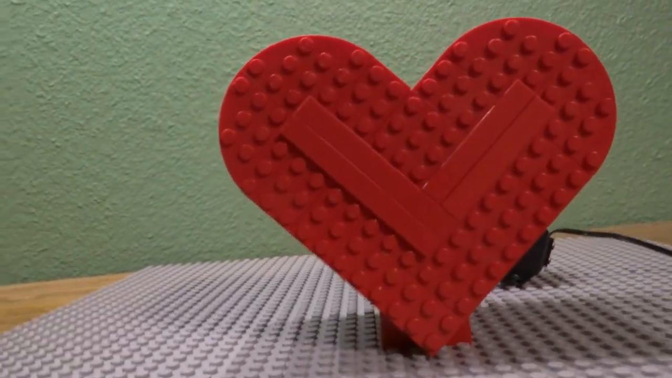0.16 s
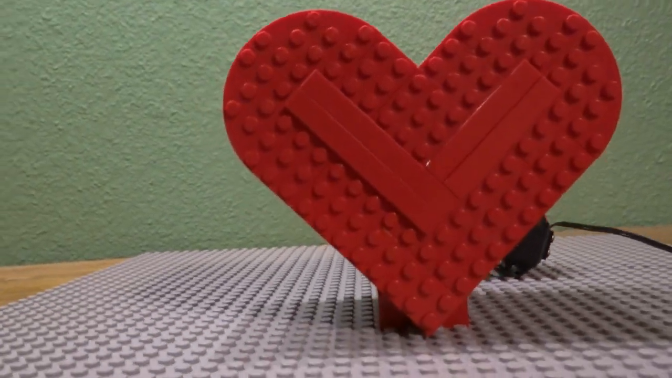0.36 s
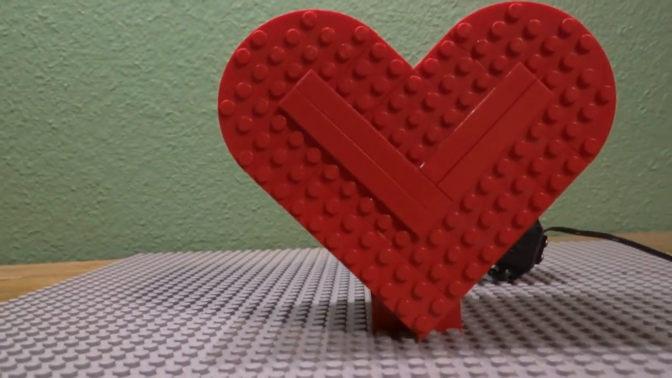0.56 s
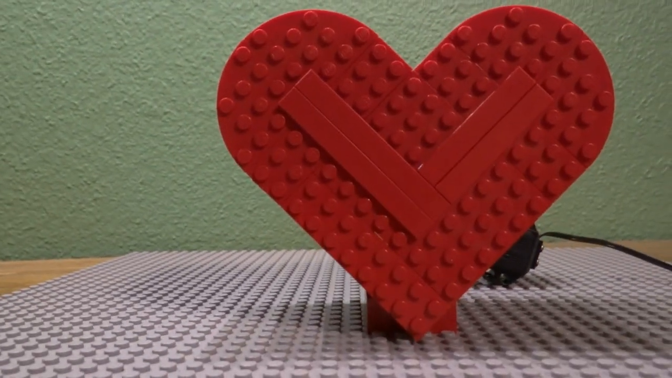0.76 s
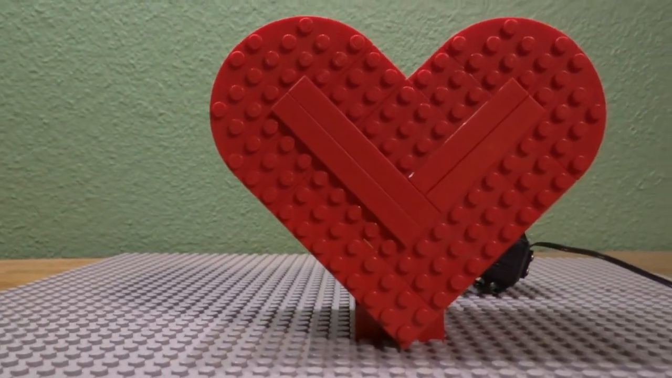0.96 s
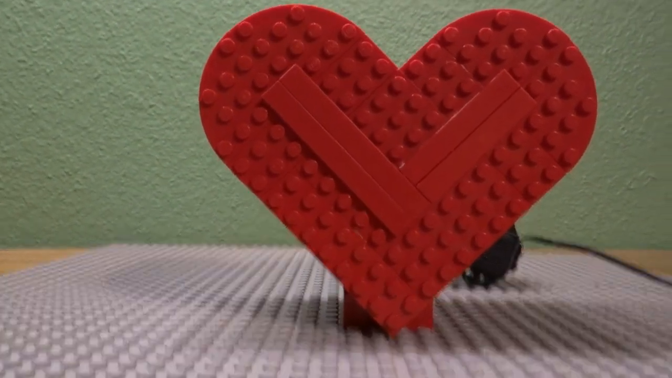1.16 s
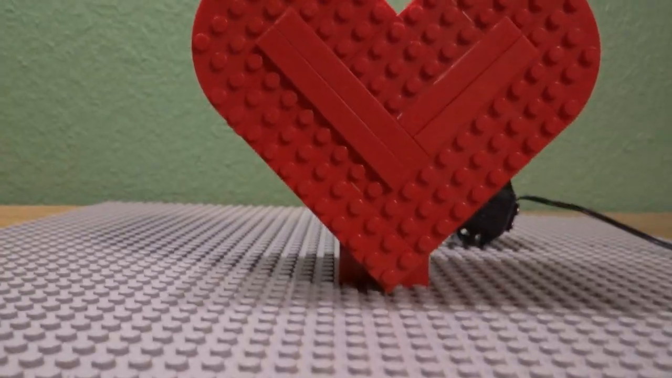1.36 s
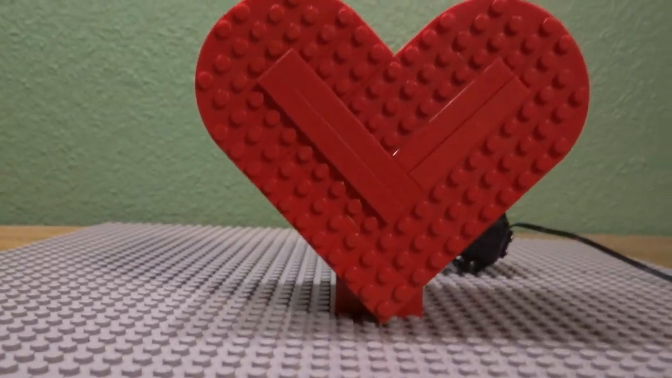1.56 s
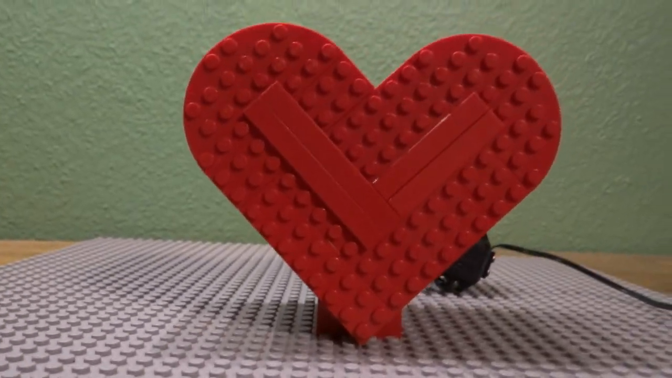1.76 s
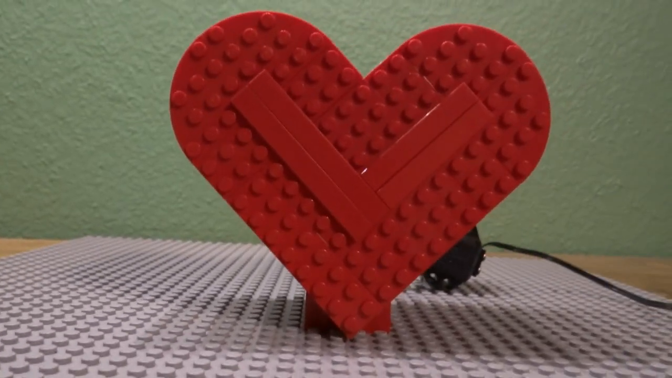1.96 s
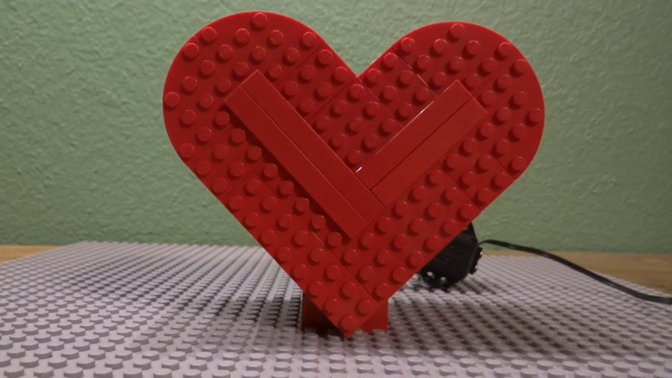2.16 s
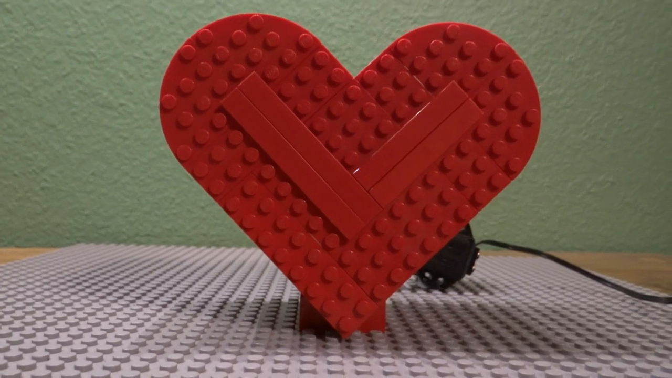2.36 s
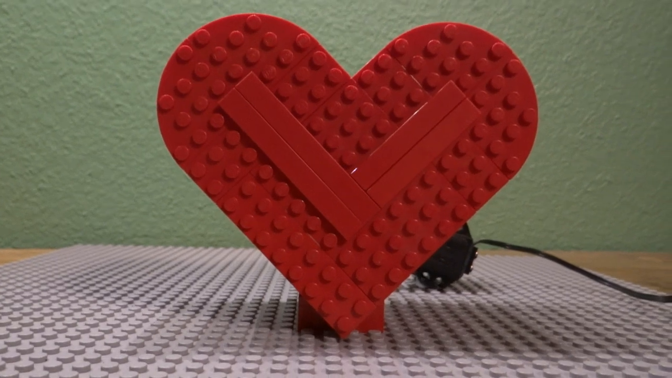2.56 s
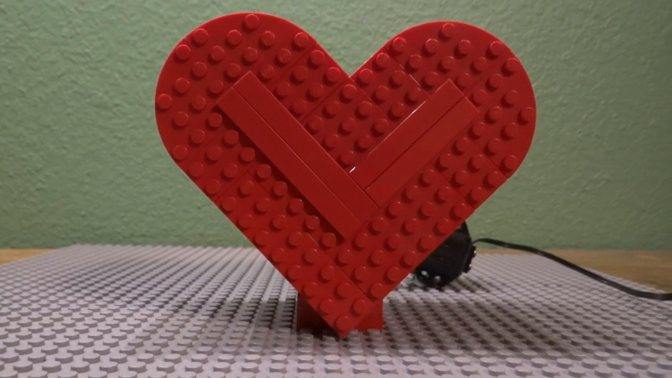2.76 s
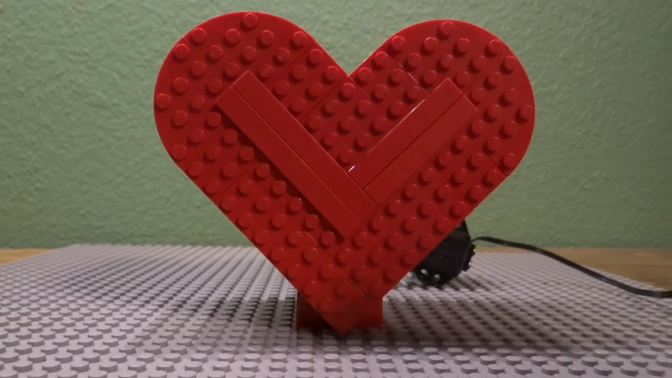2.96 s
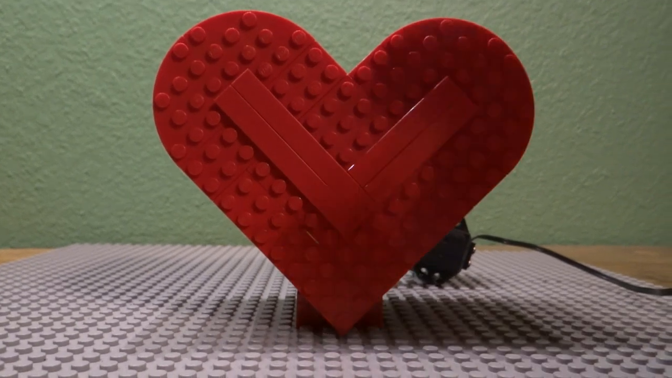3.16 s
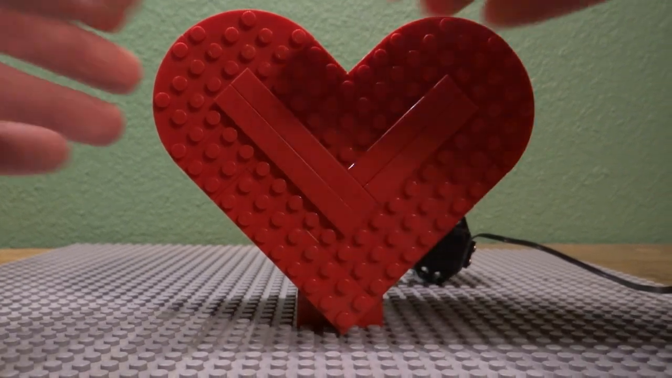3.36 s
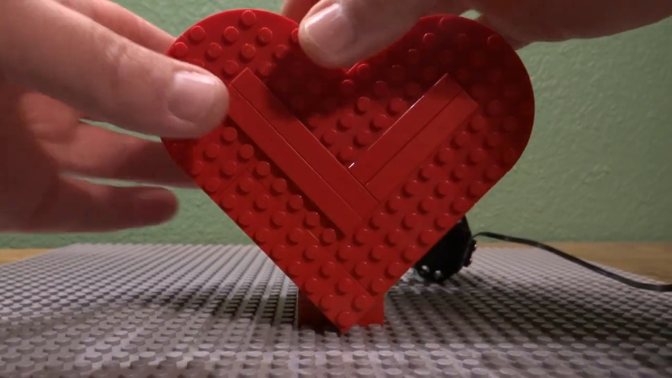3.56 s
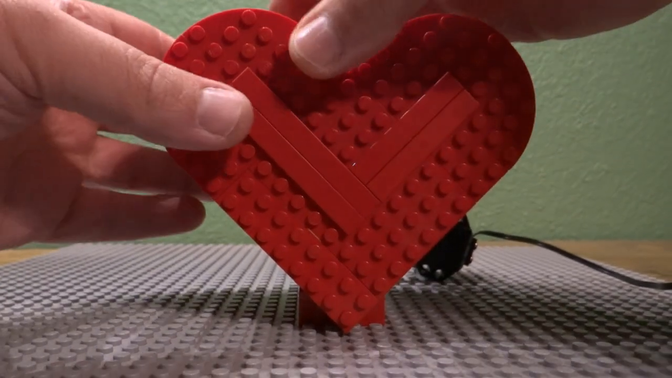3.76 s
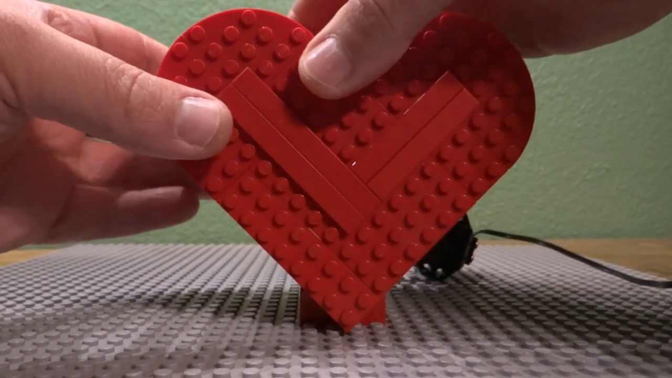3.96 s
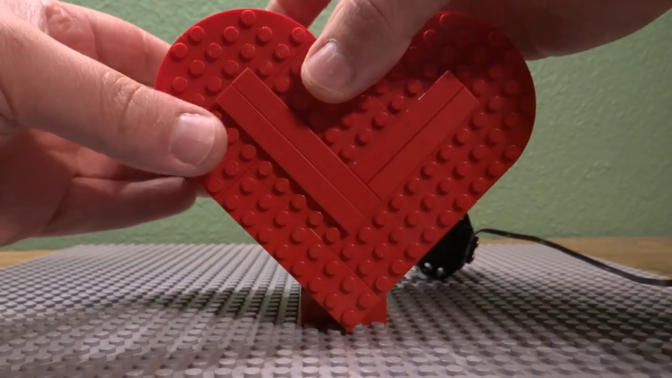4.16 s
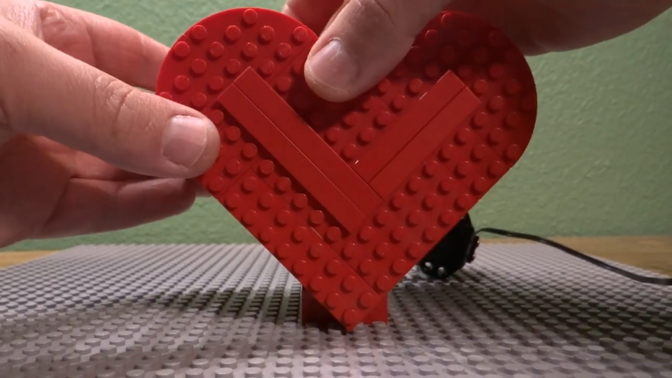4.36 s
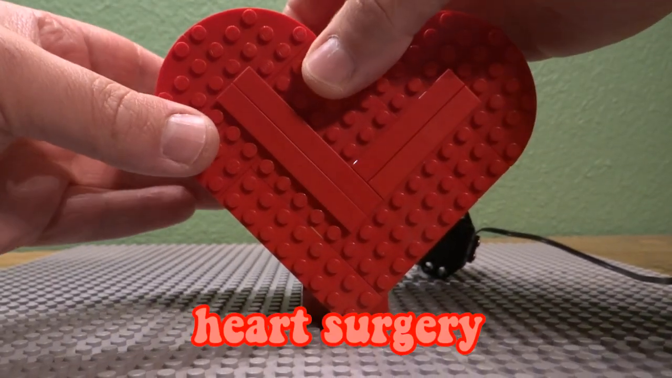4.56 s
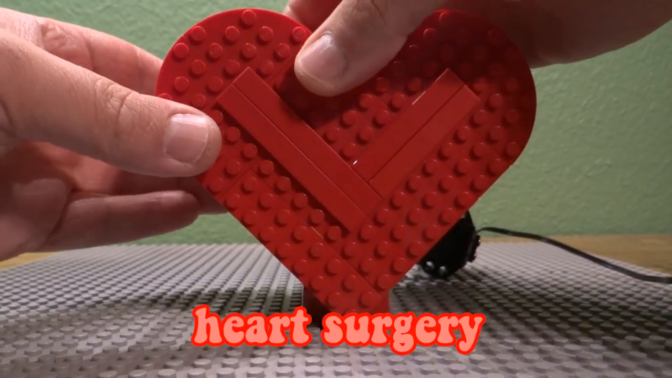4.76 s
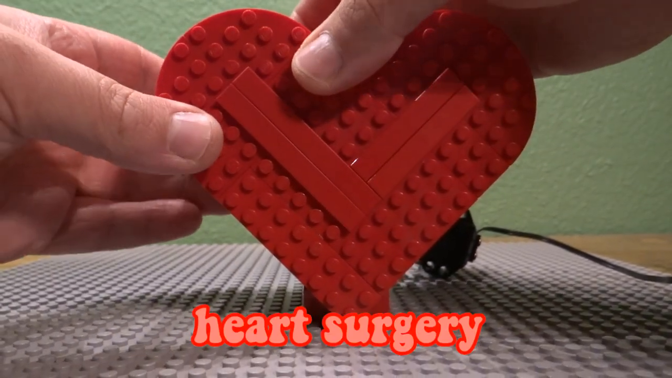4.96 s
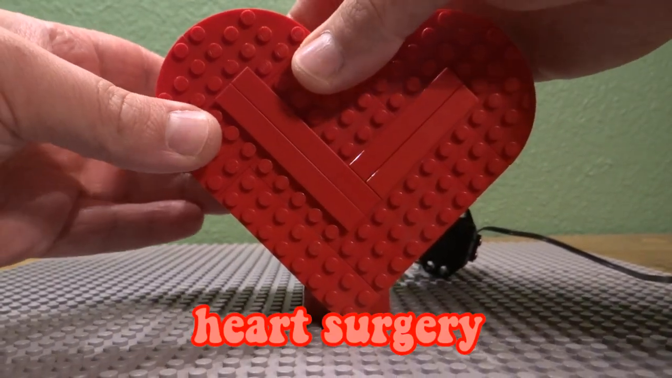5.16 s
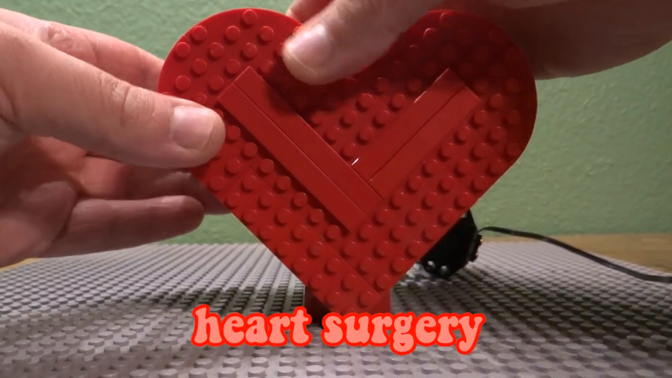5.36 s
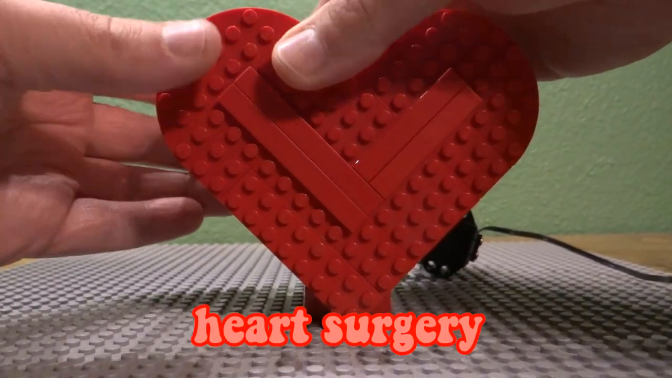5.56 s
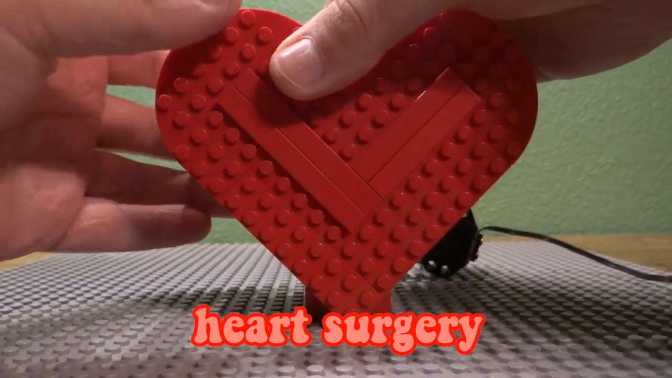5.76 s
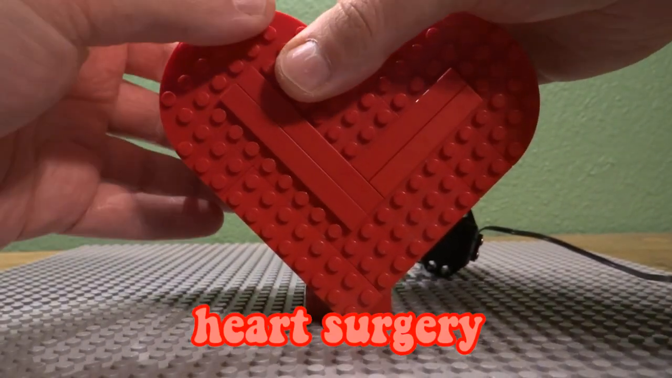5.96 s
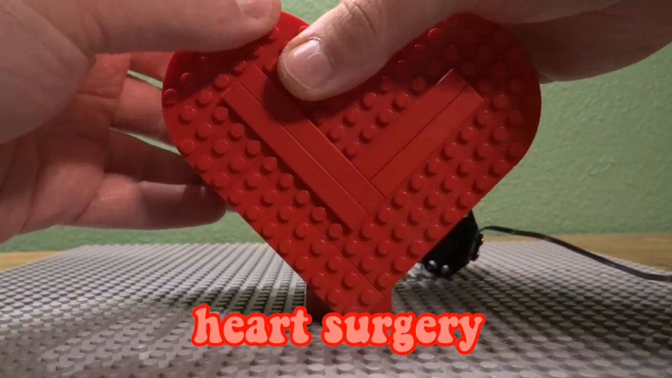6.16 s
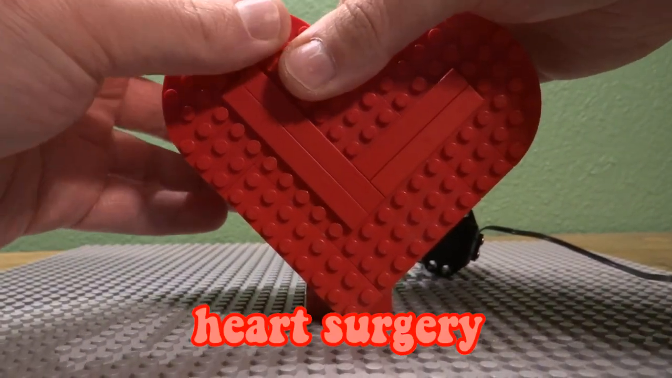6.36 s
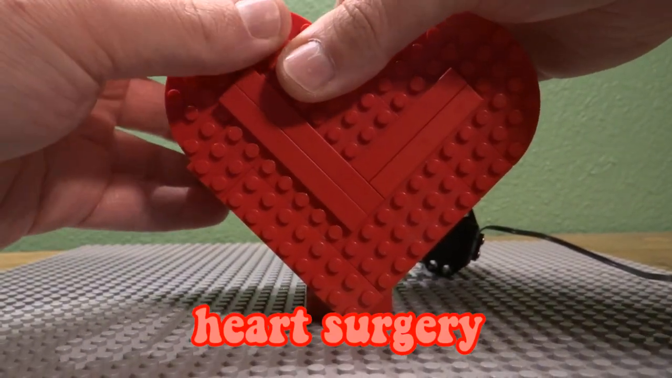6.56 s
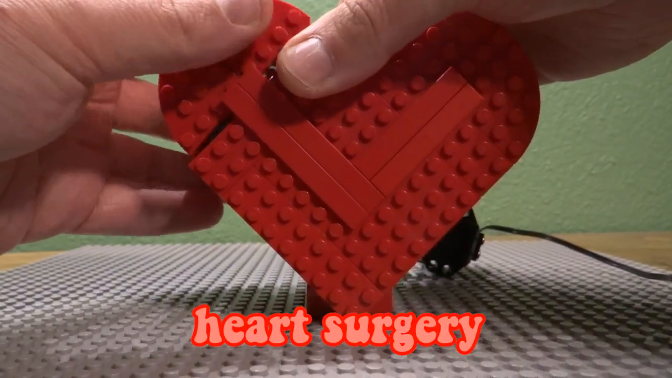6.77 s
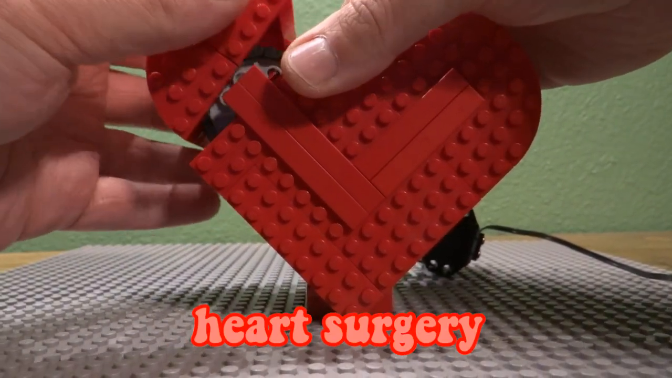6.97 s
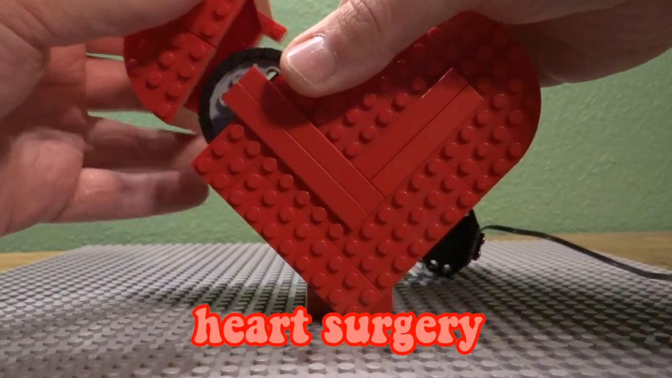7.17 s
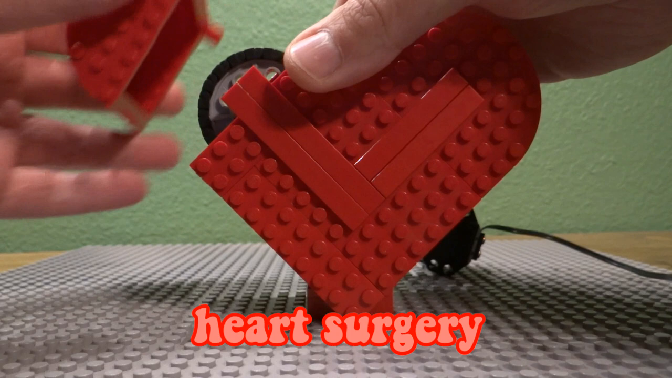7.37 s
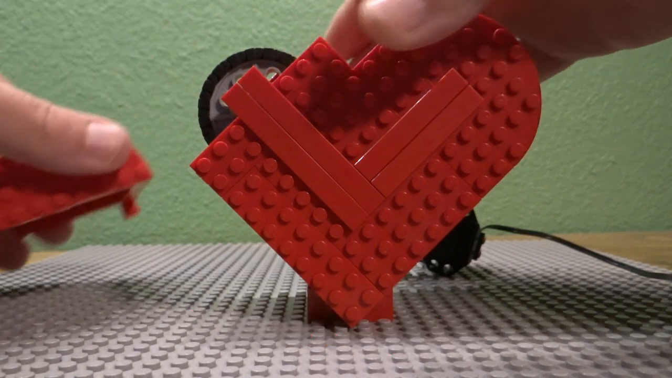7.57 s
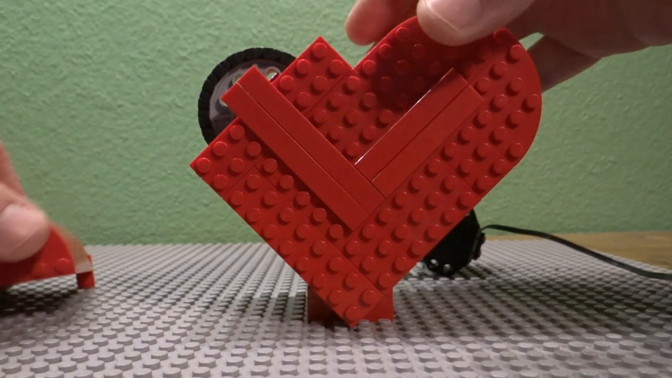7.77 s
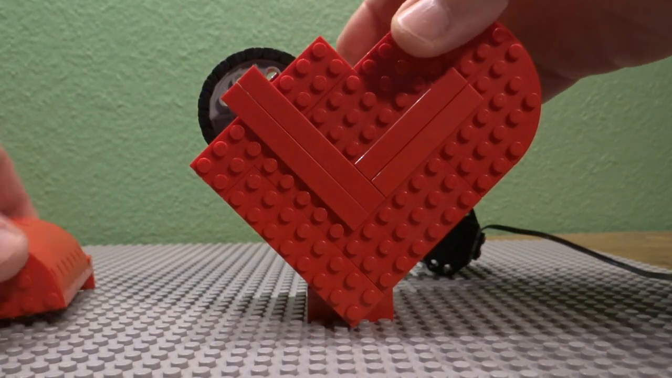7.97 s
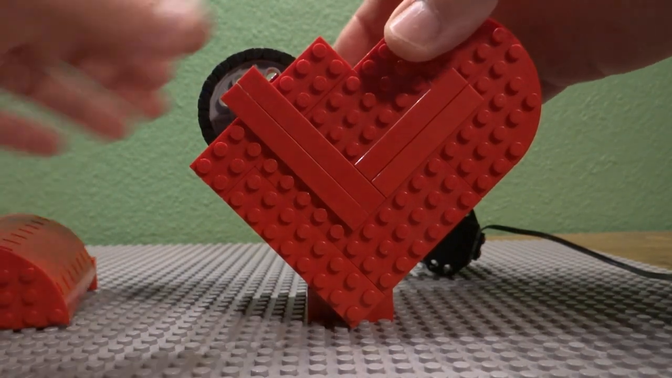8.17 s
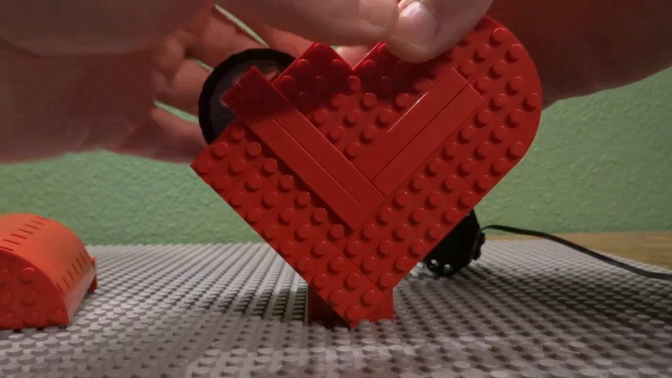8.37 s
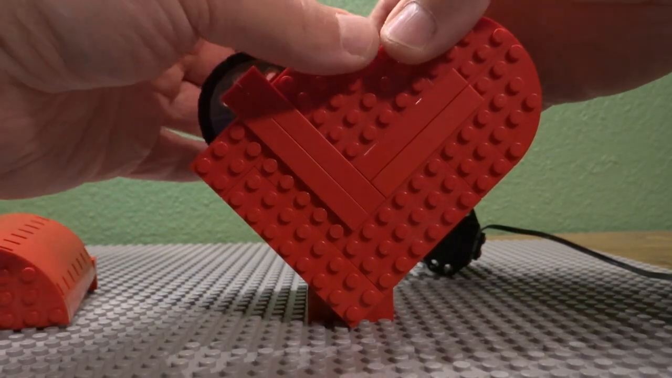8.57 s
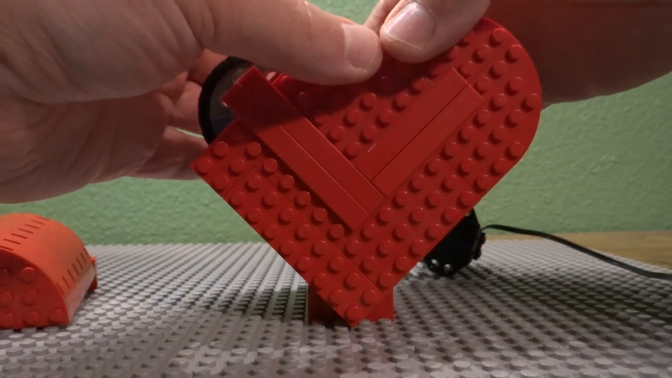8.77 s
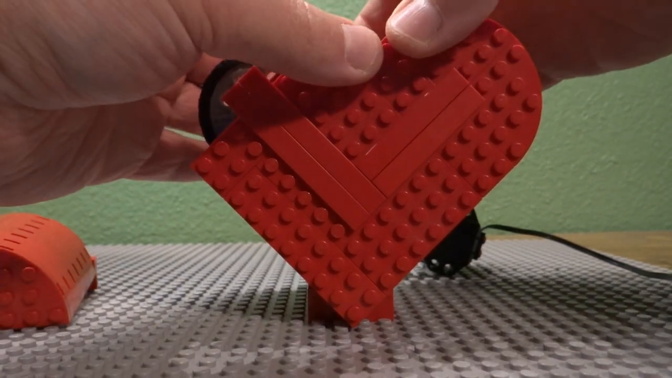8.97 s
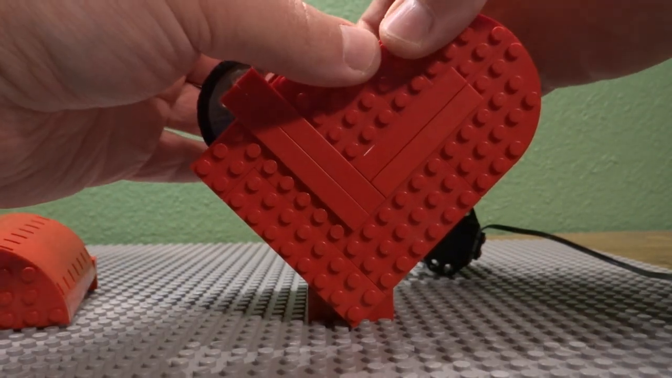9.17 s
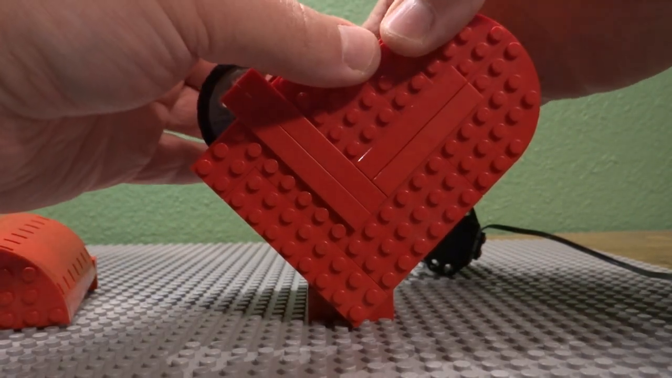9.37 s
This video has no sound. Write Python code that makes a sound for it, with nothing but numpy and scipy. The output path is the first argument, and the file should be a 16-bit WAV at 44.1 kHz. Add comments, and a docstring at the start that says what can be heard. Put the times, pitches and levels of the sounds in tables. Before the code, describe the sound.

In a small quiet room with a faint low hum, something is shifted close by with ticks, rubs and thin squeaks. After a lull, hands knock onto a hollow plastic brick model, fidget softly, then pry a cover off in a quick run of bright snaps. It lands with a clack and short boom on a plate, and fingers click at the next piece. Close microphone, nearly dry.

```python
"""Toy bricks taken apart by hand

In a small quiet room with a mains hum, a mount is shifted: it rubs, ticks and squeaks thinly. Then hands grip
a hollow model of plastic bricks, prise a cover off stud by stud, set it down on a plate and start on the next.
Blows and rubbing are noise bursts and grains that ring damped modes, and squeaks are gliding tones.
Skin, sleeves and air are bands of noise; the hum is steady tones, and feedback delays make the room."""
import sys
import numpy as np
from scipy import signal
from scipy.io import wavfile
from scipy.ndimage import uniform_filter1d

SR = 44100
rng = np.random.default_rng(int(sys.argv[2]) if len(sys.argv) > 2 else 0)


def wav_record(signal):
    """Record a signal, one row per channel, as 16-bit PCM in the file named by sys.argv[1]."""
    frames = np.transpose(np.atleast_2d(signal))
    bounded = np.clip(frames, -1, 1)
    # unit amplitude maps onto the largest positive 16-bit level
    quanta = np.round(bounded * 32767).astype(np.int16)
    wavfile.write(sys.argv[1], SR, quanta)


N = 414981


def from_db(db):
    """Gain of a level in dB."""
    return 10 ** (np.asarray(db) / 20)


def rms_one(x):
    """Scaled to rms 1."""
    return x / np.sqrt(np.mean(x ** 2) + 1e-20)


def peak_one(x):
    """Scaled so that the loudest 7 ms have rms 1."""
    power = uniform_filter1d(x ** 2, size=300, axis=-1)
    return x / np.sqrt(power.max(axis=-1, keepdims=True))


def butter(x, order, hz, kind):
    """Filters out the pitches outside a band, below a point or above it."""
    return signal.sosfilt(signal.butter(order, hz, kind, fs=SR, output="sos"), x)


def in_time(rows, fade=0.061):
    """Columns as sample curves, and a gate that fades out beyond the rows (fade in s)."""
    s, *columns = np.transpose(rows)
    t = np.arange(N) / SR
    gate = np.clip(1 + np.minimum(t - s[0], s[-1] - t) / fade, 0, 1)
    return [gate] + [np.interp(t, s, c) for c in columns]


def at_hz(points, hz):
    """A curve over pitch, read on a log-frequency axis."""
    points_hz, values = np.array(points).T
    return np.interp(np.log(hz), np.log(points_hz), values)


def drift(rate_hz):
    """Slow chance of spread 1: smoothed noise made at every 40th sample."""
    r = np.exp(-2 * np.pi * rate_hz * 40 / SR)
    white = rng.standard_normal(N // 40 + 2002)
    slow = signal.lfilter([1], [1, -2 * r, r * r], white)[2000:]
    return np.interp(np.arange(N) / 40, np.arange(len(slow)), rms_one(slow))


def strokes(rows, steady):
    """Gains of all columns: strokes swell and die evenly in dB over steady stretches; powers add."""
    t, power = np.arange(0, N + 64, 64) / SR, 1e-20
    for s, rise, fall, *levels_db in rows:
        # rise and fall take 3 ms at least
        drop_db = 20 * np.maximum((s - t) / max(rise, .003), (t - s) / max(fall, .003))
        power = power + from_db(np.array(levels_db)[:, None] - drop_db) ** 2
    for start, end, *levels_db in steady:
        gate = np.clip(1 + np.minimum(t - start, end - t) / 0.03, 0, 1)
        power = power + (gate * from_db(levels_db)[:, None]) ** 2
    return [np.interp(np.arange(N) / SR, t, np.sqrt(p)) for p in power]


# How alike left and right are: pitch_hz, likeness (0 to 1)
STEREO_LIKENESS = [(30, 0.16), (120, 1), (500, 0.26), (2000, 0.29), (8000, 0.87), (15000, 1)]


def banded_noise(spectrum, patchy_db, lowest, shine_db=0):
    """Half-octave bands of flickering stereo noise from lowest (Hz); shine lifts the bands above 10 kHz."""
    out, edges, together = 0, lowest * 2 ** np.arange(0, 9.9, .5), drift(25)
    white = rng.standard_normal((2, 2, N))
    for k, (low, high) in enumerate(zip(edges, edges[1:])):
        hz = np.sqrt(low * high)
        if hz < spectrum[0][0]:
            continue
        mid, side = butter(white[k % 2], 2, [low, high], "band")
        alike = np.clip(at_hz(STEREO_LIKENESS, hz), 0, 1)
        flicker_db = patchy_db * (together + 0.11 * drift(60))
        gain = from_db(at_hz(spectrum, hz) + flicker_db + shine_db * (hz > 10000))
        out = out + gain * (np.sqrt(1 + alike) * mid + np.sqrt(1 - alike) * side * [[1], [-1]])
    return rms_one(out)


# Tones of the hum: pitch_hz, relative_level_db
HUM_TONES = [(120.3, 3.5), (61, -28.5), (223, -29.5), (532, -12.5), (11100, -121), (11630, -32)]


def hum():
    """Steady mains tones: pure sines, each starting at a random point of its swing."""
    t = np.arange(N) / SR
    out = 0
    for hz, db in HUM_TONES:
        out = out + np.sqrt(2) * from_db(db) * np.sin(2 * np.pi * (hz * t + rng.random()))
    return out


# Colour of the air: pitch_hz, relative_level_db (per Hz)
AIR_COLOUR = [(20, -17), (45, -34.5), (85, -7), (200, -10), (300, -1.5), (400, -37.5), (520, 25),
              (650, -10), (900, -6), (1440, -17.5), (2340, -14), (5000, -24), (10000, -26.5),
              (16000, -32.5)]
# Room tone as it rises and sinks: time_s, hum_gain_db, air_level_db
ROOM_TONE = [(0.0, -64, -61), (.8, -65.5, -63.5), (2.1, -65.5, -65.5), (3.8, -66, -65.5), (4.1, -71, -67),
             (4.9, -71.5, -70.5), (6.3, -69, -65), (7.7, -70.5, -68), (9.41, -69.5, -66.5)]


def room_tone():
    """Quiet air, a broad noise, with the hum; both change slowly in level."""
    _, hum_db, air_db = in_time(ROOM_TONE)
    air = from_db(air_db) * banded_noise(AIR_COLOUR, patchy_db=2.1, lowest=24)
    return air + from_db(hum_db) * hum()


# Low jolts through mount and table: start_s, peak_db, pitch_hz
LOW_JOLTS = [(.335, -66, 60), (.555, -67, 38), (2.03, -69, 38), (4.03, -67, 45), (5.585, -56, 150),
             (6.61, -71, 60)]


def jolts(cycles=5.2):
    """Each jolt is a few cycles of deep wobble that swell and die."""
    t, out = np.arange(N) / SR, 0
    for s, peak_db, hz in LOW_JOLTS:
        turn = np.clip((t - s) * hz / cycles, 0, 30)
        swell = np.e * 3 * turn * np.exp(-3 * turn)
        out = out + from_db(peak_db) * swell * np.sin(2 * np.pi * cycles * turn)
    return out


def room(x):
    """Six feedback delays a side, like sound between walls, duller on every round."""
    t60_s, wall_cut_hz = 0.21, 4900
    out, dull = np.zeros((2, N)), np.exp(-2 * np.pi * wall_cut_hz / SR)
    for k, lag in enumerate((rng.uniform(.009, 0.025, 12) * SR).astype(int)):
        loop, gain, state = x.copy(), from_db(-60 * lag / SR / t60_s), [0.]
        for i in range(lag, N, lag):
            back, state = signal.lfilter([gain * (1 - dull)], [1, -dull], loop[i - lag:i], zi=state)
            loop[i:i + lag] += back[:N - i]
        # only the echoes are kept, half of them turned over
        out[k % 2] += (loop - x) * (-1) ** (k // 2)
    return out


# Colour of skin and cloth: pitch_hz, relative_level_db (per Hz)
CLOTH_COLOUR = [(1200, -5), (2000, -1), (3000, 1.5), (4000, 3.5), (5700, 1.5), (8000, 3), (11400, -15),
                (16000, -14)]
# Skin, sleeves and studs brush past: peak_s, rise_s, fall_s (each over 20 dB),
# relative_level_db, relative_level_db above 10 kHz
BRUSHES = [(.04, 0.6, 0.31, -53, -50.5), (.31, 0.016, 0.032, -47.5, -31.5), (.37, 0.037, 0.37, -61.5, -49),
           (.8, .15, 0.19, -64.5, -49), (.93, 0.055, 0.14, -64.5, -55), (1.08, 0.083, 0.057, -66, -44),
           (1.42, 0.71, .4, -66.5, -49), (1.62, 0.22, .3, -66.5, -50), (1.83, 0.1, 0.19, -74, -46),
           (2.19, 0.16, 0.21, -64, -45), (2.85, 0.081, 0.084, -52.5, -45), (3.4, 0.96, 9.5, -61, -56),
           (3.81, 0.037, 0.068, -60, -78), (4.04, 0.04, 0.063, -41, -50), (4.41, 0.1, 0.053, -77, -109),
           (4.66, 0.059, 0.026, -53, -44), (4.79, 0.13, 0.11, -63.5, -54.5), (5.53, 0.071, 0.25, -53, -48),
           (5.98, 0.37, 0.12, -66, -59), (6.24, 0.12, 0.083, -66, -49.5), (6.41, 0.19, 0.11, -66, -55.5),
           (6.71, 0.018, 0.035, -33, -27), (7.16, 0.24, 0.29, -63, -74), (7.35, .15, 0.12, -71, -67),
           (7.62, 0.49, 1.1, -59, -52), (7.912, 0.0015, 0.037, -37.5, -96), (8.14, 0.46, 0.22, -63.5, -69),
           (8.44, 0.38, 0.43, -59.5, -52.5), (8.55, 0.12, 0.097, -53.5, -52), (8.76, 0.21, 0.099, -55, -55),
           (8.96, 0.27, 2.6, -68, -62.5)]
# A faint rustle beneath them: start_s, end_s, relative_level_db, relative_level_db above 10 kHz
FAINT_RUSTLE = [(0.0066, 7.5, -84.5, -68)]


def rustle():
    """Many tiny rubs of skin and sleeves blur into noise that swells with every brush."""
    brush, shine = strokes(BRUSHES, FAINT_RUSTLE)
    shine_db = 20 * np.log10(shine / brush)
    return brush * banded_noise(CLOTH_COLOUR, patchy_db=1.0, lowest=26.5, shine_db=shine_db)


def ring(push, hz, t60):
    """One damped mode; a small body radiates little bass below it."""
    r, w = from_db(-60 / (t60 * SR)), 2 * np.pi * hz / SR
    return signal.lfilter([1, 0, -1], [1, -2 * r * np.cos(w), r * r], push + 1e-18) / np.sqrt(t60)


# Borders of the thud, knock, clack and snap ranges: pitch_hz
BORDERS_HZ = [180, 600, 2400, 6200, 15500]


def by_range(push, modes, strength):
    """The body's modes summed into thud, knock, clack and snap."""
    ranges = np.zeros((4,) + push.shape)
    for k, (hz, level_db, t60) in enumerate(modes):
        gain = from_db(level_db) * strength[..., k:k + 1]
        ranges[np.searchsorted(BORDERS_HZ, hz) - 1] += gain * ring(push, hz, t60)
    ranges[:3] = butter(ranges[:3], 3, [110, 9500], "band")   # lower modes carry no sizzle
    return ranges


def friction(gains, modes, per_s, grainy_db, spot_hz, focus_db):
    """Dense stick-slip grains ring the modes; knock modes lose focus_db per octave from the rubbed spot's pitch."""
    grains = (rng.random(N) < per_s / SR) * rng.standard_normal(N) * from_db(grainy_db * drift(18))
    mode_hz = np.array(modes)[:, 0]
    is_knock = (mode_hz > BORDERS_HZ[1]) * (mode_hz < BORDERS_HZ[2])
    octaves_off = abs(np.log2(mode_hz / spot_hz)) * is_knock
    lower_modes = [m for m in modes if m[0] < BORDERS_HZ[3]]
    ranges = by_range(grains, lower_modes, from_db(-focus_db * octaves_off))
    return sum(gain * rms_one(part) for gain, part in zip(gains, ranges))


def favour(sounds, centre_hz, sharpness):
    """Each sound through a broad resonance at its own pitch."""
    filtered = []
    for x, hz in zip(sounds, centre_hz[:, 0]):
        filtered.append(signal.lfilter(*signal.iirpeak(hz, sharpness, fs=SR), x))
    return np.array(filtered)


def blows(events, modes, spiky_db, tail_t60, ring_db, focus_db, crack_hz, dull_hz):
    """Each blow is a dying rattle of tiny contacts with a tail, heard as a bare crack and through the modes."""
    rows, size = np.array(events), SR // 3
    peak_db, t60, knock_hz, clack_hz, tail_db = (rows[:, k:k + 1] for k in (1, 6, 7, 8, 10))
    t = np.arange(size) / SR
    shape = (len(rows), size)
    contacts = rng.standard_normal(shape) * from_db(spiky_db * rng.standard_normal(shape))
    decay = from_db(-60 * t / np.clip(t60, .002, .3)) + from_db(tail_db - 60 * t / tail_t60)
    decay = decay + from_db(-0.5 - 60 * t / 0.013)   # extra force at the start
    rattle = contacts * decay * np.clip((t - .0009) / 0.0012, 0, 1)

    # the struck spot favours the knock and clack modes near its own pitches
    mode_hz = np.array(modes)[:, 0]
    spot_hz = np.where(mode_hz < BORDERS_HZ[2], knock_hz, clack_hz)
    octaves_off = abs(np.log2(mode_hz / spot_hz))
    octaves_off *= (mode_hz > BORDERS_HZ[1]) & (mode_hz < BORDERS_HZ[3])
    scatter_db = 2.5 * rng.standard_normal(octaves_off.shape)
    loss_db = np.minimum(focus_db * octaves_off, 12)   # far modes lose no more than 12 dB
    rung = by_range(rattle, modes, from_db(scatter_db - loss_db))

    bare = butter(rattle, 5, dull_hz, "low")
    borders = [BORDERS_HZ[0], crack_hz] + BORDERS_HZ[2:]
    crack = [butter(bare, 3, edges, "band") for edges in zip(borders, borders[1:])]
    crack[1] = favour(crack[1], knock_hz, 1.5)
    crack[2] = favour(crack[2], clack_hz, 1.3)

    ranges = peak_one(peak_one(np.array(crack)) + from_db(ring_db)[:, None, None] * peak_one(rung))
    range_gains = from_db(rows[:, 2:6].T[:, :, None] + peak_db)
    fade_out = np.minimum((t[-1] - t) / 0.028, 1)
    sounds = np.sum(ranges * range_gains, axis=0) * fade_out
    out = np.zeros((2, N + size))
    for (s, *_, pan_db, _tail), sound in zip(rows, sounds):
        start = round(s * SR)
        out[:, start:start + size] += sound * from_db([[pan_db / 2], [-pan_db / 2]])
    return out[:, :N]


# Low creaks and thin squeaks, one list of points each: time_s, pitch_hz, level_db
SQUEAK_GLIDES = [
    [(0, 306, -55), (.05, 318, -57.5), (.07, 248, -53), (.1, 244, -62)],
    [(.015, 837, -70), (.045, 844, -57.5), (.08, 870, -70)],
    [(.22, 930, -69), (.25, 964, -55), (.28, 950, -77)],
    [(.395, 1190, -77), (.43, 1133, -52), (.45, 1160, -70)],
    [(.435, 965, -58), (.48, 915, -65), (.52, 940, -58), (.54, 990, -63)],
    [(1.3, 10000, -72), (1.35, 10200, -71), (1.42, 9550, -82), (1.47, 9200, -69), (1.5, 9150, -63),
     (1.545, 9570, -62), (1.6, 9100, -67), (1.67, 7350, -85), (1.7, 7800, -79)],
    [(1.72, 8000, -79), (1.76, 8200, -73), (1.78, 8300, -75), (1.8, 8143, -79)],
    [(8.915, 9250, -79), (8.925, 9080, -57.5), (8.945, 9000, -61), (8.965, 8700, -75)],
    [(8.905, 5400, -75), (8.92, 5520, -71), (8.95, 5760, -72), (8.975, 5520, -74), (8.995, 5400, -78)],
    [(8.89, 3267, -76), (8.912, 3853, -70), (8.934, 4090, -77), (8.96, 4040, -70.5), (8.98, 3720, -70)],
    [(8.885, 6100, -74), (8.899, 6978, -76), (8.919, 7800, -72), (8.941, 8246, -86), (8.98, 7400, -86)],
]


def squeaks(waver_db=3, wobble=.003):
    """Near sines gliding in pitch, unsteady in level."""
    out = 0
    for rows in SQUEAK_GLIDES:
        gate, hz, level_db = in_time(rows, fade=0.0055)
        level = gate * from_db(level_db + waver_db * drift(89))
        turns = np.cumsum(hz * (1 + wobble * drift(120))) / SR
        out = out + level * np.sin(2 * np.pi * turns)
    return np.sqrt(2) * out


# Modes of the mount: pitch_hz, relative_level_db, t60_s (time to die by 60 dB)
MOUNT_MODES = [(337, -10, 0.033), (503, -8, 0.058), (550, -10, 0.019), (632, 15.5, 0.044), (926, 18, 0.014),
               (1142, 12.5, 0.019), (1450, -3, 0.0086), (1960, 13, 0.02), (2444, 40.5, 0.019),
               (2800, 43.5, 0.016), (3060, 28.5, 0.038), (3600, 6, 0.03), (4700, 7, 0.017),
               (5940, 28, 0.001), (9300, 0, 0.00073), (10900, -23, .006)]
# Strokes of rubbing on the mount: peak_s, rise_s, fall_s (each over 20 dB), thud_db, knock_db, clack_db
MOUNT_RUBS = [(.06, 0.15, 0.24, -70, -66, -60.5), (.335, 0.05, 0.047, -74, -43.5, -76),
              (.53, 0.23, .12, -72, -60.5, -65), (.82, 0.051, 0.038, -69, -64, -57),
              (1.08, 0.053, 0.056, -77, -64, -56.5), (1.25, 0.31, 0.47, -72, -89, -69),
              (1.66, 0.27, 0.1, -88, -64.5, -61.5), (1.81, 0.02, 0.095, -62, -61, -52),
              (1.98, 0.43, 0.17, -77, -55, -93), (2.19, 0.1, 0.1, -63.5, -65, -61.5)]
# A hand rests on the mount: start_s, end_s, thud_db, knock_db, clack_db
HAND_ON_MOUNT = [(0, 2.4, -77.5, -75.5, -78)]


def mount_rubbing():
    """The mount sticks and slips as it is shifted, and rings softly."""
    gains = strokes(MOUNT_RUBS, HAND_ON_MOUNT)
    return friction(gains, MOUNT_MODES, per_s=4000, grainy_db=1.0, spot_hz=960, focus_db=17.0)


# Ticks of the mount: start_s, peak_db, thud_db, knock_db, clack_db, snap_db (these four relative to the peak),
# rattle_t60_s, knock_hz, clack_hz, pan_db (left over right), tail_db (relative to the rattle)
MOUNT_TICKS = [(0.296, -45, -29, -7, -26, -13, 0.015, 1060, 4850, 5, -35),
               (0.317, -45, -26, -1.5, -27, -22, 0.026, 930, 2440, -24, -35),
               (0.333, -28.5, -14, -14.5, -12, -11, 0.027, 920, 2520, 3.5, -35),
               (0.349, -32, -43, -19, -8.5, -18, 0.014, 935, 2650, 5, -35),
               (0.545, -43.5, -5.5, -20, -39, -23, 0.062, 1030, 2760, -5, -35),
               (0.744, -35.5, -46, -3.5, -12.5, -45, 0.019, 1220, 2430, -5.5, -35),
               (0.922, -41.5, -29, -20, -11.5, -9, 0.02, 975, 3200, 4, -35),
               (1.057, -50, -15, -14, -18, -15, 0.02, 961, 2880, 11, -35),
               (1.218, -42, -29, -3.5, -14, -17, 0.026, 1260, 2430, -6, -35),
               (1.714, -32, -48, -6.5, -11.5, -35, 0.0079, 1130, 2360, -4.5, -40),
               (1.78, -42, -32, -3.5, -36, -37, 0.041, 982, 2730, 6, -35),
               (1.811, -54, -20, -7, -25, -28, 0.02, 996, 2850, 13, -35),
               (2.021, -46.5, -1, -34, -38, -16, 0.09, 600, 3100, 4, -35),
               (2.16, -41.5, -21, -0.5, -13.5, -14, 0.039, 1090, 2440, -5.5, -35)]
# Ring of the mount over the bare crack, in dB: thud, knock, clack, snap
MOUNT_RING_DB = [14, 9.8, 35, 26]


def mount_ticks():
    """Small knocks make the mount's modes ring briefly."""
    return blows(MOUNT_TICKS, MOUNT_MODES, spiky_db=4.0, tail_t60=0.065, ring_db=MOUNT_RING_DB,
                 focus_db=46, crack_hz=654, dull_hz=13500)


# Modes of the plate on the table: pitch_hz, relative_level_db, t60_s
PLATE_MODES = [(301.5, -2.5, 0.34), (325.7, 1, 0.24), (473, -8, 0.12), (625, 4, 0.23), (160, -13.5, 0.072)]
# The cover lands on the plate: start_s, relative_level_db
COVER_LANDINGS = [(7.911, -23), (8.03, -48), (8.1, -38), (8.207, -33)]


def plate(contact_s=0.0037):
    """A soft push sets the plate booming; its modes near 300 and 325 Hz beat."""
    push = np.zeros(N)
    for s, level_db in COVER_LANDINGS:
        push[round(s * SR)] = from_db(level_db - 12.5)
    push = np.convolve(push, np.hanning(round(contact_s * SR)) / (contact_s * SR / 2))[:N]
    push = butter(push + 1e-18, 2, 110, "high")   # little deep bass
    # neighbouring modes start in opposite sense, so the boom swells first
    out = 0
    for k, (hz, db, t60) in enumerate(PLATE_MODES):
        out = out + (-1) ** k * from_db(db) * ring(push, hz, t60)
    return out


# Modes of the bricks and their plate: pitch_hz, relative_level_db, t60_s
BRICK_MODES = [(178.9, -2.5, 0.031), (290, -7.5, 0.016), (314, 6.5, 0.056), (375, 6, 0.031), (434, -5, .04),
               (517.4, -4.5, 0.17), (599.6, 1.5, 0.075), (862, -2, 0.03), (975, 1, 0.04), (1200, 7, .035),
               (1270, 6, .028), (1350, 8, .03), (1435, 3, .1), (1890, 9, 0.02), (2200, 6, 0.022),
               (2330, 7, .018), (2734, -4, 0.032), (3070, -2.5, 0.018), (3520, -13.5, 0.012),
               (3775, 4, 0.013), (3985, -6, 0.029), (4450, -14.5, 0.01), (5100, -6, 0.015),
               (5280, -2, 0.02), (7290, 7, 0.022), (7820, 5, 0.02), (8200, 4, .012), (8440, 9, 0.018),
               (8700, 9, 0.015), (8880, 10, 0.018), (9110, 8, .018), (10400, -4, .012),
               (11100, -5.5, 0.0056), (14160, -14, 0.0016)]
# Fingers and studs slide over the bricks: peak_s, rise_s, fall_s (each over 20 dB), thud_db, knock_db, clack_db
FINGER_STROKES = [(4.035, 0.014, 0.082, -40.5, -35.5, -74), (4.12, 0.12, 0.14, -47.5, -57, -85),
                  (4.42, 0.098, 0.14, -68, -72, -73), (4.78, .15, 0.35, -77, -74.5, -70.5),
                  (5.27, 0.5, 0.25, -72, -71, -94), (5.55, 0.24, 0.83, -64.5, -69.5, -67),
                  (6.622, 0.022, 0.05, -40.5, -41, -42), (6.8, 0.34, 0.87, -61, -78, -81),
                  (7.02, 0.13, 0.052, -76, -39.5, -71.5), (7.27, 0.051, .1, -78, -65, -61),
                  (7.95, 0.041, 0.049, -42, -70, -72), (8.05, 0.22, 0.88, -56.5, -71, -76.5),
                  (8.54, 0.17, 0.24, -61, -64, -82)]
# Hands rest on the bricks: start_s, end_s, thud_db, knock_db, clack_db
HANDS_ON_BRICKS = [(3.655, 7.49, -72, -92.5, -91), (8.3, 9.397, -69.5, -76.5, -94.5)]


def finger_rubbing():
    """Fingers and studs stick and slip on the hollow model, waking knock modes mostly near 1200 Hz."""
    gains = strokes(FINGER_STROKES, HANDS_ON_BRICKS)
    return friction(gains, BRICK_MODES, per_s=3300, grainy_db=2.5, spot_hz=1200, focus_db=70)


# Bricks gripped, unsnapped and set down: start_s, peak_db, thud_db, knock_db, clack_db, snap_db (these four
# relative to the peak), rattle_t60_s, knock_hz, clack_hz, pan_db (left over right), tail_db (to the rattle)
BRICK_CLICKS = [(3.847, -48, -5.5, -8.5, -20, -29, 0.024, 960, 5870, 0.0, -9),
                (4.0095, -29.5, -33, -3.5, -17, -47, 0.03, 1720, 2880, -6.5, 10),
                (4.015, -24.5, -6.5, -4, -25, -42, 0.032, 1370, 2510, 1.5, -14),
                (4.021, -28.5, -6, -4, -22, -36, 0.042, 950, 3100, -1, -14),
                (4.027, -29, -5, -8, -28, -27, 0.036, 700, 3100, 1, -22),
                (4.035, -23.5, -13, -7.5, -15.5, -45, 0.026, 1680, 2720, 1, -8),
                (4.043, -29, -4, -9, -30, -39, 0.026, 1520, 2890, -1, -29),
                (4.06, -37, -1, -23, -26, -46, 0.055, 990, 3010, 1, -28),
                (4.087, -41, 0, -14, -28, -40, 0.023, 650, 3000, -2, -15),
                (4.494, -54, -41, -4.5, -29, -33, 0.065, 970, 2470, -0.5, -27),
                (4.835, -57, -29, -8, -17, -24, 0.03, 970, 3590, -3, -22),
                (5.087, -42, -15, -6.5, -20, -20, 0.039, 1180, 3100, -1.0, -25),
                (5.377, -51, -6.5, -11.5, -15, -32, 0.059, 1210, 2400, 2, -22),
                (5.513, -40.5, -18, -21, -11.5, -18, 0.054, 1170, 5410, -1, -15),
                (5.575, -34.5, -10, -7, -30, -32, 0.035, 1080, 4160, -2, -18),
                (5.823, -50, -5.5, -8.5, -29, -28, 0.048, 970, 4910, 0, -25),
                (6.104, -34.5, -41, -20.5, -16.5, -12.5, 0.019, 1040, 3840, 2, -24),
                (6.117, -45, -40, -16, -15, -9, .02, 1200, 3900, 0, -25),
                (6.128, -49, -26, -5.5, -23, -25, .03, 980, 3800, 1, -25),
                (6.213, -32, -35, -13.5, -12, -11, 0.029, 1260, 3680, 2, -20),
                (6.238, -40.5, -19, -5, -18, -35, 0.022, 1890, 3780, -2, -25),
                (6.342, -56, -28, -2, -25, -31, 0.027, 980, 4200, 0.0, -30),
                (6.381, -48.5, -20, -12, -15, -8.5, 0.09, 620, 4300, 2, -16),
                (6.548, -52.5, -10, -4, -36, -34, 0.047, 630, 2400, -1.0, -22),
                (6.603, -24, -14, -9.5, -9, -11.5, 0.07, 1020, 4550, 2, -26),
                (6.622, -22, -46, -9.5, -18, -11, 0.029, 1250, 3070, 2, -9.5),
                (6.665, -29.5, -38, -2, -40, -16, 0.025, 1260, 2420, 0.0, -14.5),
                (6.68, -27.5, -18.5, -30, -16, -14, 0.041, 1200, 2900, 1, -4),
                (6.7, -20.5, -20, -7.5, -12, -17, 0.035, 1230, 3800, -2, -7),
                (6.708, -26, -25, -6, -14, -14, .02, 2220, 3100, 4, -21),
                (6.7175, -16, -26, -4, -30, -21, 0.017, 2070, 4200, 1, -26),
                (6.723, -20.5, -25, -15, -15.5, -5, 0.025, 1260, 2700, 2, -17.5),
                (6.788, -45, -26, -15, -12, -2, 0.03, 1210, 2430, 3, -31),
                (6.825, -19.5, -32, -11.5, -16, -10, 0.038, 2210, 3460, 1.5, -18),
                (6.893, -44, -18, -5, -11, -6, 0.026, 1220, 3980, 1.5, 9),
                (6.921, -20.5, -55, -5.5, -17, -12.5, 0.03, 1310, 2570, 2, -17.5),
                (6.949, -28, -44, -6, -14, -11.5, 0.035, 1330, 2700, -2.5, -11.5),
                (6.9665, -34, -30, -3, -25, -29, .03, 1310, 2700, 6, -25),
                (6.9698, -13.5, -38, -4.5, -18, -10, 0.032, 2110, 2740, 2, -27),
                (6.975, -16, -15.5, -10.5, -15, -10, 0.023, 1350, 2700, 0.5, -11),
                (6.984, -24.5, -14, -4, -28, -16, 0.035, 1930, 3800, -3.5, -20),
                (6.992, -28, -25, -6, -24.5, -16, 0.046, 1450, 2620, -3, -2),
                (7.031, -33.5, -23, -22, -10.5, -11, 0.035, 1440, 2800, 1, -28),
                (7.052, -43, -34, -6, -25, -23, 0.033, 1440, 3800, 0, -8),
                (7.143, -44, -17, -17, -13, -20, 0.04, 1320, 3640, 0.0, -7),
                (7.209, -33, -48, -15, -12.5, -10.5, 0.027, 2280, 4020, 2.5, -18),
                (7.285, -34.5, -19, -14.5, -16.5, -18, 0.092, 1200, 3780, 2, -8),
                (7.304, -32.5, -16, -9, -18.5, -15.5, 0.074, 1160, 5100, -2, -22),
                (7.912, -22.5, -16, -7.5, -11.5, -20, 0.022, 2165, 3870, 3, -20.5),
                (7.918, -29, -15, -14, -3.5, -29, 0.027, 1250, 3040, 4, -17),
                (8.03, -41, -12, -11, -15, -22, 0.024, 1400, 3820, 3.5, -28),
                (8.1, -29.5, -15.5, -6.5, -11, -19.5, 0.017, 1070, 3730, 2.5, -20),
                (8.148, -51, -24, -20, -2, -27, 0.035, 1920, 2710, 1, -15),
                (8.208, -27.5, -18.5, -10, -11, -20.5, 0.046, 2220, 2940, 3.5, -17),
                (8.482, -46, -9, -10, -19, -29, 0.038, 1190, 2490, 1, -11),
                (8.503, -28, -33, -13.5, -9.5, -17.5, 0.044, 1110, 4260, -2.5, -31),
                (8.551, -28, -29, -10, -9.5, -17.5, 0.024, 1090, 4660, -1.5, -34),
                (8.67, -31.5, -23, -10, -8, -14, 0.052, 1100, 4500, -2, -36),
                (8.684, -42, -18, -2.5, -21, -35, 0.023, 930, 3800, 3.5, -32),
                (8.713, -26, -51, -15.5, -4.5, -20, 0.018, 1190, 4080, -2, -33),
                (8.749, -28.5, -24, -11, -13.5, -13.5, 0.015, 1100, 4150, 1, -25),
                (8.817, -40, -17, -9, -15, -17, 0.024, 1190, 3890, 2, -22),
                (8.829, -38.5, -21, -8, -8, -44, 0.026, 1130, 3600, -2.5, -17),
                (8.86, -43.5, -14.5, -13, -8.5, -41, 0.028, 1190, 3720, 1, -23),
                (9.154, -45, -7, -6, -28, -44, 0.047, 1890, 3560, 0.5, -22),
                (9.218, -51.5, -9, -11, -38, -38, 0.03, 1450, 2410, 0.0, -17),
                (9.258, -47.5, -8.5, -6.5, -24, -38, 0.026, 724, 3400, 0.0, -30)]
# Ring of the bricks over the bare crack, in dB: thud, knock, clack, snap
BRICKS_RING_DB = [3, 9, 2, 10]


def brick_clicks():
    """Gripped, parting and landing bricks knock together and ring as hollow plastic."""
    return blows(BRICK_CLICKS, BRICK_MODES, spiky_db=2.0, tail_t60=0.24, ring_db=BRICKS_RING_DB,
                 focus_db=49, crack_hz=750, dull_hz=10680)


def scene():
    """Blows, rubbing and squeaks in the room, over rustle, jolts, air and hum."""
    near = mount_ticks() + brick_clicks() + mount_rubbing() + finger_rubbing() + squeaks() + plate()
    echoes = from_db(-20) * room(near.mean(axis=0))
    return near + echoes + rustle() + jolts() + room_tone()


def record(dry):
    """The treble is cut steeply above 15750 Hz."""
    return signal.sosfilt(signal.ellip(12, .5, 70, 15750, fs=SR, output="sos"), dry)


dry = scene()
out = record(dry)
wav_record(out)
```